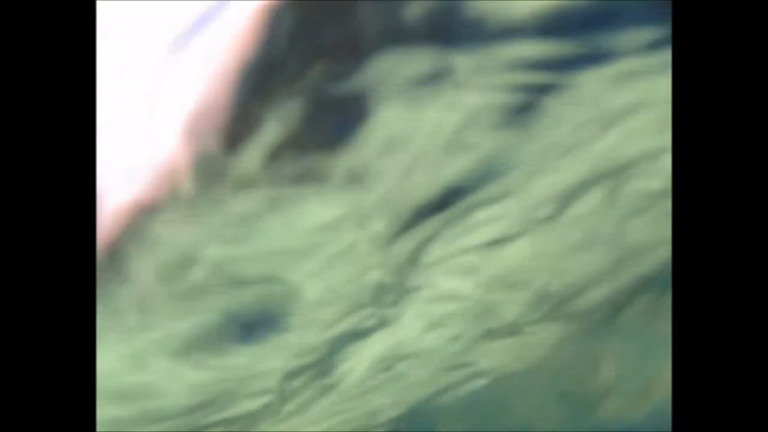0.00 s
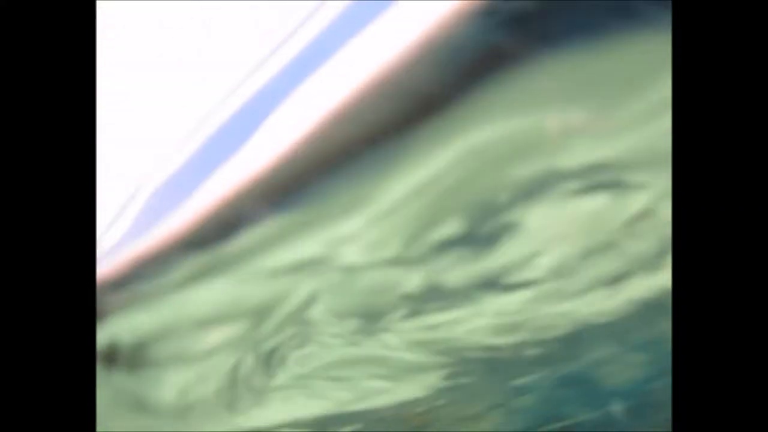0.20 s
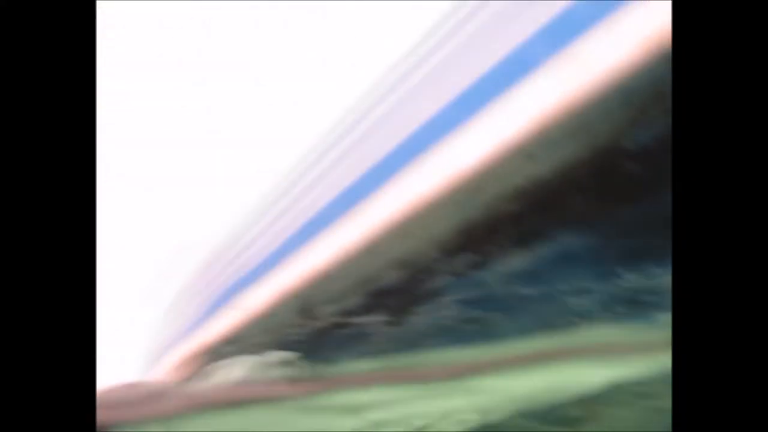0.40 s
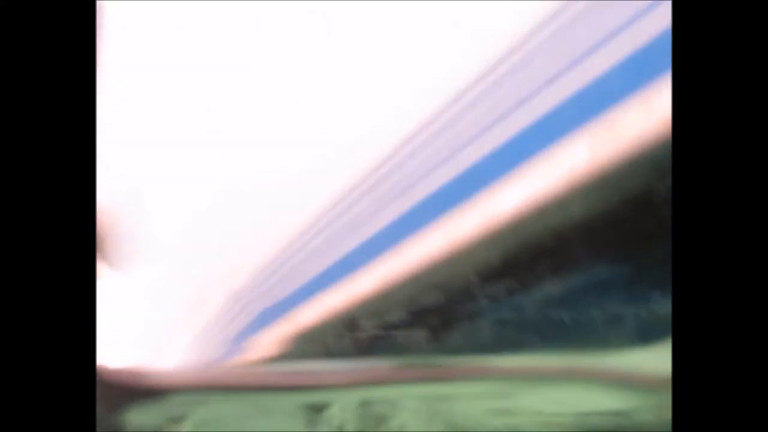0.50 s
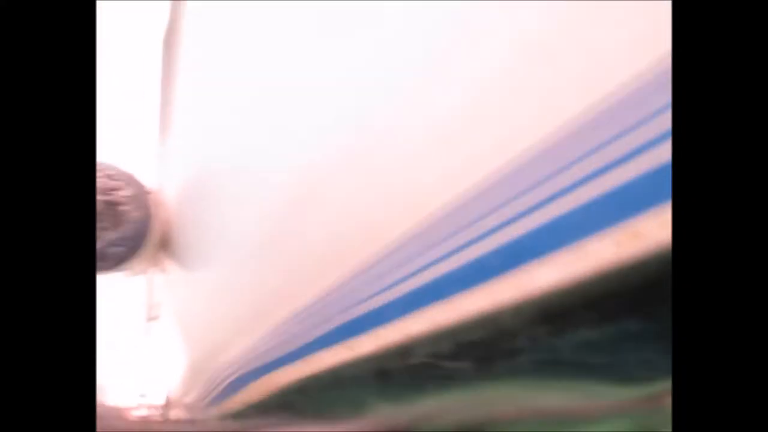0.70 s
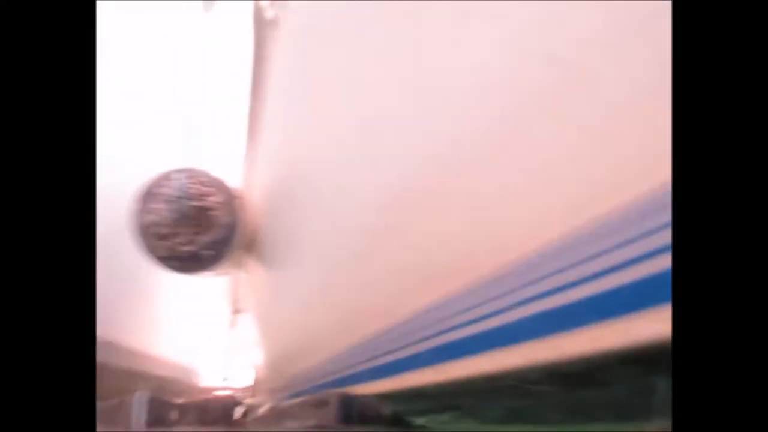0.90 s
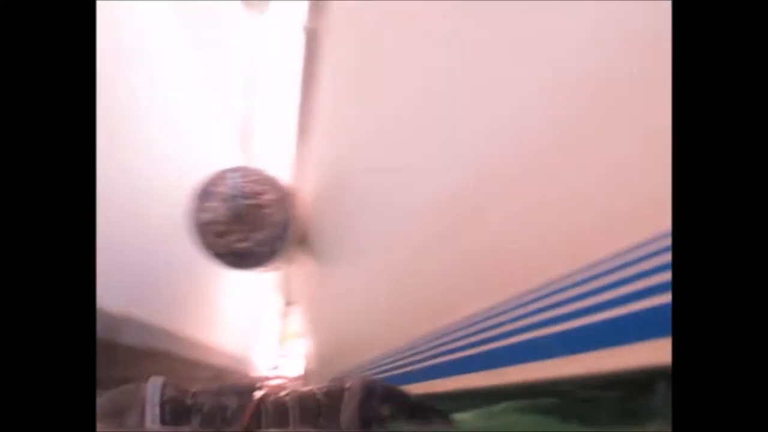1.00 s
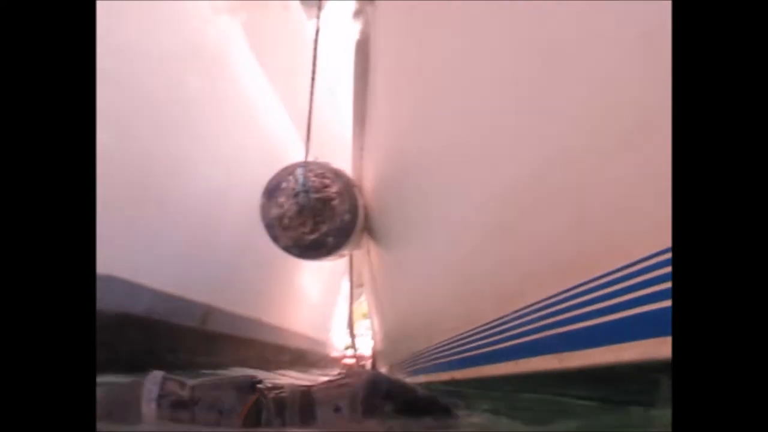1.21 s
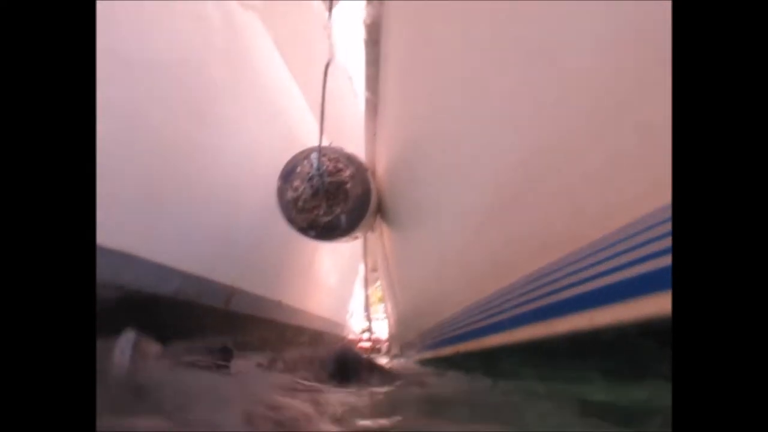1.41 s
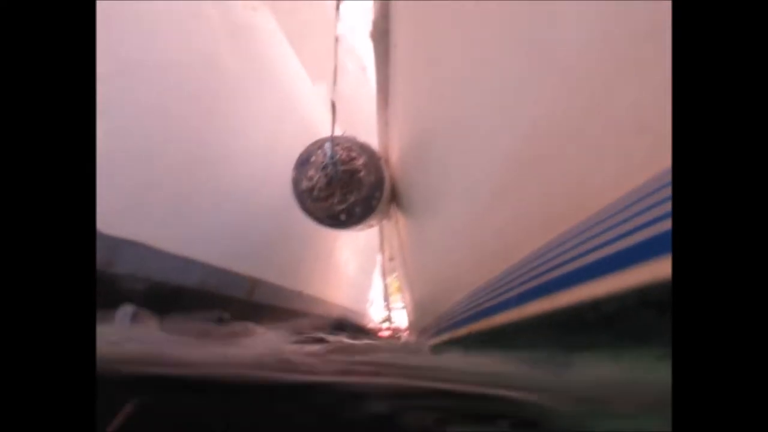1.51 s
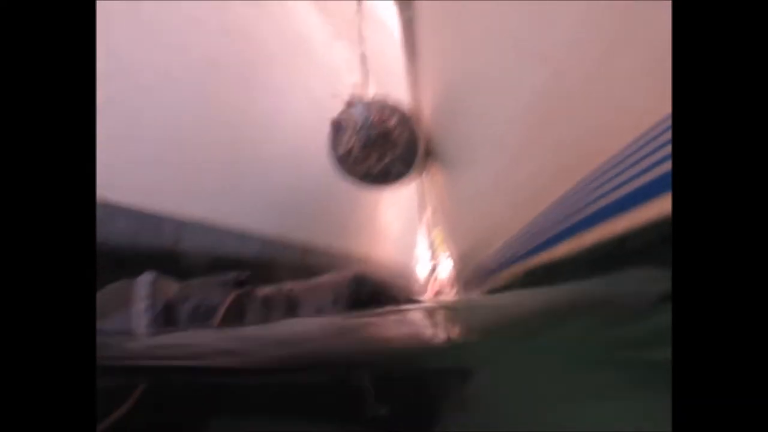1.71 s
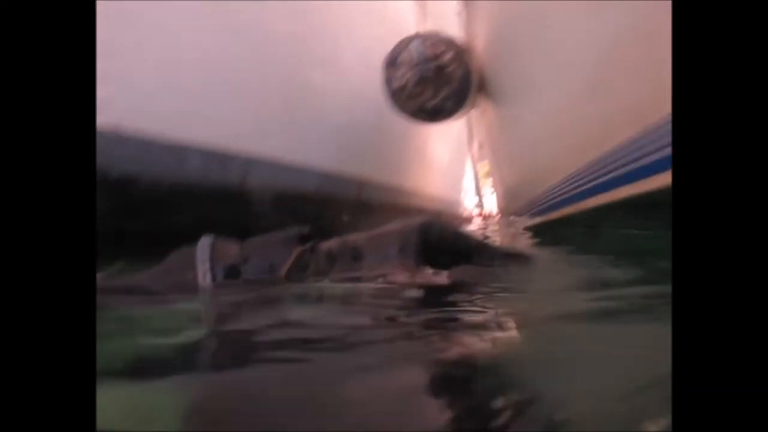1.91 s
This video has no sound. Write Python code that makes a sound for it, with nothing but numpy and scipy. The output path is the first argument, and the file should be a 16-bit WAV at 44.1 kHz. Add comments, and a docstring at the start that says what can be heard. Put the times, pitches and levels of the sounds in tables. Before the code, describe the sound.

A brush scrapes a hull at the waterline, close and muffled by a waterproof housing. Knocks and low plops lead into a loud gritty burst, a softer rub follows, then sparse ticks, bubbles and steady high electronic whine.

```python
"""Scrubbing a boat hull at the waterline

Heard through a waterproof camera housing. Bristle slips scrape in strokes and ring the housing's modes,
with snapping grit and rising bubble blips. Shaped noise bursts make knocks, ticks, plops and water crackle
that ring the hull; the tool clacks in short gritty notes, and a hard press rasps in narrow resonances.
Filtered noise washes softly underneath, and a sine is the thin steady whine of the electronics."""
import sys
import numpy as np
from scipy import signal
from scipy.fft import rfft, irfft
from scipy.io import wavfile

SR = 44100
rng = np.random.default_rng(int(sys.argv[2]) if len(sys.argv) > 2 else 0)


def waveform_to_disk(signal):
    """Save audio, clipped to [-1, 1], as 16-bit WAV at the path in sys.argv[1]."""
    frames = np.transpose(np.atleast_2d(signal))
    scaled = np.clip(frames, -1, 1) * 32767
    samples = np.round(scaled).astype(np.int16)
    wavfile.write(sys.argv[1], SR, samples)


N = 88200  # length in samples
SIZE = 4096  # samples in one short event, and points in a random wander
TOP_HZ = 16150  # upper edge of the microphone's band

# The brush strokes as breakpoints, before judder and flicker.
# Each row: time in seconds, level of the low rub in dB, level of the bristle hiss in dB.
STROKES = [(0, -63, -69), (.13, -53.5, -61), (0.16, -51, -46.5), (.21, -42, -49), (.25, -41, -32.5),
           (.32, -36, -45.5), (0.386, -36.5, -46), (0.419, -51.5, -52), (.47, -56.5, -60),
           (.59, -58.5, -61), (0.636, -51.5, -49.5), (.675, -44, -47.5), (.715, -44.5, -46.5),
           (.745, -53, -54), (.80, -62, -61.5), (.87, -60, -65.5), (.96, -52, -58), (1.0, -52.5, -62),
           (1.11, -56, -54.5), (1.21, -66, -66.5), (1.30, -57.5, -56), (1.37, -57, -60.5),
           (1.428, -54.5, -55), (1.53, -61.5, -64.5), (1.59, -57, -56.5), (1.69, -58.5, -55.5),
           (1.80, -58.5, -53.5), (1.85, -52.5, -55), (1.947, -49.5, -54.5), (2.0, -69, -68)]
JUDDER_PER_S, JUDDER_DB = 70.42, 2  # wander points per second, depth

# Contact and rattle of the short blows
BASS_LAG_S, LAG_HZ = 0.001972, 614  # how late the lowest notes arrive, and where the lag halves
CHATTER_S, CHATTER_HZ = 0.0003, 2440  # contact chatter: time scale, and pitch above which it takes over
RATTLE_S = 0.0056  # time for a rattle to fade to 1 / e
LEVEL_WINDOW_S = 0.009  # the level of a blow or clack is its rms as if spread over this time
ROUND_OCT, UPPER_STEEPNESS = 0.56, 1.33  # rounding of a spectral peak; upper skirt over lower skirt
TICK_SKIRT_DB, TICK_RATTLE_DB = 9.5, -4  # skirt per octave; rattle against the contact
HITS_DB = -5  # shared trim of knocks, plops, ticks, grit and crackle


def undb(db):
    """Decibels to gain."""
    return 10 ** (np.asarray(db) / 20)


def unit(x):
    """Scale to an rms of one."""
    return x / np.sqrt(np.mean(x ** 2))


def freqs(size):
    """Frequencies of a real spectrum in Hz, kept above zero."""
    return np.maximum(np.arange(size // 2 + 1) * SR / size, 1)


def causal(gain):
    """Minimum phase: the promptest causal response with these gains, by folding the cepstrum."""
    cepstrum = irfft(np.log(gain + 1e-6))
    half = len(cepstrum) // 2
    cepstrum[1:half] *= 2
    cepstrum[half + 1:] = 0
    return np.exp(rfft(cepstrum))


def colour(x, points):
    """Filter by a spectrum of (Hz, dB) points, joined straight over log frequency."""
    hz, db = np.array(points, float).T
    gain = undb(np.interp(np.log(freqs(2 * N)), np.log(hz), db))
    return irfft(rfft(x, 2 * N) * causal(gain))[:N]


def walk(rate):
    """Random wander with a spread near one: straight lines between `rate` random points a second."""
    return np.interp(np.arange(N) / SR * rate, np.arange(SIZE), rng.standard_normal(SIZE))


def add(out, s, sound):
    """Mix a sound in at a time in seconds."""
    i = int(np.clip(s * SR, 0, N - 1))
    out[i:i + len(sound)] += sound[:N - i]


def chance_events(per_s):
    """Independent random events at a mean rate: time in seconds, with (strength, pitch) draws."""
    chance = rng.standard_normal((SIZE, 2))
    times = np.cumsum(rng.exponential(1, SIZE)) / per_s
    return zip(times[times < N / SR], chance)


def ring(x, modes):
    """What a set of resonant modes, each (Hz, width Hz, gain dB), makes of a sound."""
    f = freqs(2 * N)
    response = 0
    for hz, width, db in modes:
        response = response + undb(db) / (1 + 1j * (f * f - hz * hz) / (f * width))
    return irfft(rfft(x, 2 * N) * response)[:N]


def hump(hz, skirt_db):
    """A rounded spectral peak; the lower skirt falls in dB per octave, the upper one more steeply."""
    octaves = np.log2(freqs(SIZE) / hz)
    steepness = np.where(octaves > 0, UPPER_STEEPNESS, 1)
    return undb(-abs(skirt_db) * steepness * (np.hypot(octaves, ROUND_OCT) - ROUND_OCT))


def burst(envelope):
    """Spectrum of a noise burst of unit energy."""
    x = rng.standard_normal(SIZE) * envelope
    return rfft(x) / np.sqrt(np.sum(x ** 2))


def blow(db, gain, rattle_db):
    """One push that chatters in the treble and, as bending waves do, lags in the bass; then a rattle."""
    t, f = np.arange(SIZE) / SR, freqs(SIZE)
    push = 1 / (1 + 1j * f / CHATTER_HZ)
    contact = push + (1 - push) * burst(t * np.exp(-t / CHATTER_S))
    rattle = undb(rattle_db) * burst(np.exp(-t / RATTLE_S))
    lag = np.exp(-2j * np.pi * BASS_LAG_S * LAG_HZ * np.arctan(f / LAG_HZ))
    y = irfft(causal(gain) * lag * (contact + rattle))
    return y * undb(db) * np.sqrt(LEVEL_WINDOW_S * SR / np.sum(y ** 2))


def brush():
    """Thousands of bristle slips a second: a low rub and a hiss judder together and ring the housing."""
    # Tone of the low rub. Each row: frequency in Hz, gain in dB.
    rub_spectrum = [(80, -33), (250, -8.5), (450, -8.5), (650, 0), (900, -4.5), (1550, 2), (1950, -11),
                    (2800, -9), (4500, -51), (16000, -71)]
    # Tone of the bristle hiss. Each row: frequency in Hz, gain in dB.
    hiss_spectrum = [(500, -13), (2000, -4), (3000, 2.5), (3700, -2.5), (4400, -1.5), (6500, -5.5),
                     (8400, -5), (10300, -4), (12500, -25), (16000, -36)]
    # Modes of the housing. Each row: frequency in Hz, width in Hz, gain over the direct sound in dB.
    housing_modes = [(400, 93, -3.5), (669, 25, -6), (885, 26, 9), (1155, 150, -26), (1516, 145, -1.5),
                     (3200, 140, -17), (3620, 75, -3.5), (6240, 53, 1), (8430, 100, 7.5)]
    slips_per_s, slip_scatter_db = 9000, 4
    stroke_s, rub_db, hiss_db = np.array(STROKES).T
    judder_db = JUDDER_DB * walk(JUDDER_PER_S)
    out = np.zeros(N)
    for spectrum, db in ((rub_spectrum, rub_db), (hiss_spectrum, hiss_db)):
        happens = rng.random(N) < slips_per_s / SR
        direction = rng.choice([-1, 1], N)
        slips = happens * direction * undb(slip_scatter_db * rng.standard_normal(N))
        stroke = undb(np.interp(np.arange(N) / SR, stroke_s, db) + judder_db)
        out += stroke * unit(colour(slips + ring(slips, housing_modes), spectrum))
    return out


def grit():
    """Specks of growth snap off under the bristles, louder as the stroke hisses louder."""
    per_s, centre_hz, spread_oct = 81, 4530, 0.63
    level_db, scatter_db = -8, 2.5  # level against the bristle hiss, before the hits trim
    stroke_s, _, hiss_db = np.array(STROKES).T
    out = np.zeros(N)
    for s, (strength, pitch) in chance_events(per_s):
        db = np.interp(s, stroke_s, hiss_db) + level_db + scatter_db * strength
        hz = centre_hz * 2 ** (spread_oct * pitch)
        add(out, s, blow(db, hump(hz, TICK_SKIRT_DB), TICK_RATTLE_DB))
    return out


def bubbles():
    """Strokes stir up short blips that rise slightly as they fade, louder as the brush rubs harder."""
    per_s, start_hz, spread_oct = 87, 940, 0.696
    fade_cycles, glide = 3, 0.026  # cycles to fade to 1 / e; fraction the pitch rises in that time
    level_db, scatter_db = -6.5, 9.5  # against the level of the rub
    stroke_s, rub_db, _ = np.array(STROKES).T
    out, t = np.zeros(N), np.arange(SIZE) / SR
    for s, (strength, pitch) in chance_events(per_s):
        cycles = start_hz * 2 ** (spread_oct * pitch) * t
        age = cycles / fade_cycles
        envelope = np.exp(-age) * (1 - np.exp(-2 * cycles))
        blip = envelope * np.sin(2 * np.pi * cycles * (1 + glide * age / 2))
        db = np.interp(s, stroke_s, rub_db) + level_db + scatter_db * strength
        add(out, s, blip * undb(db))
    return out


def crackle():
    """Faint pops in the water, at random times, levels and pitches."""
    per_s, centre_hz, spread_oct = 55, 1157, 1.12
    level_db, scatter_db = -62, 4  # before the hits trim
    out = np.zeros(N)
    for s, (strength, pitch) in chance_events(per_s):
        hz = centre_hz * 2 ** (spread_oct * pitch)
        db = level_db + scatter_db * strength
        add(out, s, blow(db, hump(hz, TICK_SKIRT_DB), TICK_RATTLE_DB))
    return out


def water():
    """A soft wash around the housing: filtered noise that wavers in level."""
    # Tone of the wash. Each row: frequency in Hz, gain in dB.
    wash_spectrum = [(20, 13.5), (45, -13.5), (100, -10), (220, -1), (400, -5), (1400, -9.5), (2200, -11.5),
                     (4000, -19.5), (9500, -30), (12500, -16), (16000, -21)]
    level_db, waver_db, waver_per_s = -56.5, 2.5, 17.0
    wash = rng.standard_normal(N) * undb(waver_db * walk(waver_per_s))
    return undb(level_db) * unit(colour(wash, wash_spectrum))


def whine():
    """The thin steady tone of the camera's electronics: one sine."""
    hz, level_db = 5881, -58  # rms level
    return undb(level_db) * np.sqrt(2) * np.sin(2 * np.pi * hz * np.arange(N) / SR)


def knocks():
    """Hard contacts: a main spectral peak with a bright crack on top, then a rattle."""
    # Each row: start in seconds, level in dB before the hits trim, centre in Hz, lower skirt in dB per
    # octave, crack in dB against the main peak, rattle in dB against the contact.
    knock_rows = [ (0.0625, -38, 1210, 7.5, -39, 5), (0.0703, -31, 1120, 10, -53, -9),
                  (0.097, -43.5, 1180, 8.5, -32, 5), (0.1987, -38, 1380, 24, -26, -15),
                  (0.2441, -23.5, 1540, 10, -37, -2), (0.3736, -25, 970, 9, -48, -1),
                  (0.4493, -39.5, 3040, 13, -31, 6), (.547, -46.5, 1750, 4.5, -14, -5),
                  (0.571, -45, 1140, 34, -36, -14), (0.656, -40.5, 1600, 37, -16, 13),
                  (0.7114, -36, 1870, 22, -34, 24), (.758, -33.5, 1230, 17, -10, 5),
                  (0.8951, -36.5, 1300, 12, -35, 3.5), (.968, -45, 1270, 7.5, -16, -8),
                  (1.009, -40.5, 1560, 13, -29, 12), (1.082, -43, 1650, 6, -23, -4),
                  (1.133, -39, 1550, 11, -16.5, 2), (1.233, -42, 860, 11.5, -37, -2),
                  (1.324, -48.5, 3620, 29, -9, -17), (1.42, -38.5, 1640, 4.5, -8.5, 8.5),
                  (1.5, -38.5, 1850, 18, -29, 14), (1.514, -34.5, 2040, 7, -34, -11),
                  (1.563, -41, 1220, 21, -21, -3), (1.59, -41, 790, 31, -24.5, 9),
                  (1.6125, -50, 750, 26, -21, -1), (1.6395, -46.5, 734, 14, -17, -11),
                  (1.729, -44.5, 620, 14, -13, 3), (1.745, -45.5, 1870, 25, -25, 1)]
    crack = hump(8000, 12.5)  # Hz, dB per octave
    out = np.zeros(N)
    for s, db, hz, skirt_db, crack_db, rattle_db in knock_rows:
        gain = np.hypot(hump(hz, skirt_db), undb(crack_db) * crack)
        add(out, s, blow(db, gain, rattle_db))
    return out


def plops():
    """Low plops of water against the housing: blows with a low spectral peak."""
    # Each row: start in seconds, level in dB before the hits trim, centre in Hz.
    plop_rows = [(.074, -35.5, 270), (.176, -36.5, 255), (.2225, -30.5, 606), (.2345, -33, 270),
                 (0.549, -49.5, 275), (0.726, -45, 576), (1.082, -49.5, 249), (1.472, -48, 477),
                 (1.5145, -43.5, 520), (1.641, -54, 380), (1.606, -47, 247), (1.731, -49.5, 248),
                 (1.847, -51.5, 376), (1.929, -55, 208)]
    skirt_db, rattle_db = 15.5, -9.5  # per octave; against the contact
    out = np.zeros(N)
    for s, db, hz in plop_rows:
        add(out, s, blow(db, hump(hz, skirt_db), rattle_db))
    return out


def clacks():
    """The tool strikes hard spots: short gritty notes, high ones shorter, and a rattle with the bass cut."""
    # Each spot rings at its own pitches. Each row: start in seconds, level in dB before the low cut,
    # fade to 1 / e at 1 kHz in seconds, notes as pairs of pitch in Hz and relative level in dB.
    clack_rows = [(0.2173, -17.5, 0.0061, [(1720, 3), (2650, 2), (5310, -4)]),
                  (.2344, -12, 0.0024, [(2730, -3), (4150, -4.5), (7900, -8.5)]),
                  (0.2909, -17.5, .0055, [(1390, 3), (2320, 0), (3490, -1.5)]),
                  (0.3326, -13.5, 0.0044, [(630, 1), (1090, 1), (1570, 0.5), (2730, -5)]),
                  (1.0223, -30.5, 0.0065, [(1250, -3.5), (3200, -1.5), (3680, 2), (4500, -5)]),
                  (1.4676, -27.5, 0.0032, [(974, 1), (1490, 2.5), (1950, -15)]),
                  (1.606, -36, 0.0059, [(680, -8), (1200, 0)])]
    grit_db, rattle_db, skirt_db = -7.5, -11, 11  # both against the tone; skirt per octave
    out, t = np.zeros(N), np.arange(SIZE) / SR
    for s, db, ring_s, notes in clack_rows:
        clack = np.zeros(SIZE)
        for k, (hz, note_db) in enumerate(notes):
            fade = np.exp(-(t / ring_s * np.cbrt(hz / 1000)) ** 1.46)
            tone = (-1) ** k * unit(fade * np.sin(2 * np.pi * hz * t))  # alternate polarity
            rough = undb(grit_db) * burst(fade) + undb(rattle_db) * burst(np.exp(-t / RATTLE_S))
            noise = irfft(rough * causal(unit(hump(hz, skirt_db)))) * np.sqrt(SIZE)
            clack += undb(note_db) * (tone + noise)
        add(out, s, unit(clack) * undb(db) * np.sqrt(LEVEL_WINDOW_S * SR / SIZE))
    low_cut = signal.butter(2, 280, "high", fs=SR, output="sos")
    return signal.sosfilt(low_cut, out)


def ticks():
    """Sharp ticks of snapping grit and tiny bubbles: blows with a mostly high spectral peak."""
    # Each row: start in seconds, level in dB before the hits trim, centre in Hz,
    # lower skirt in dB per octave (its sign is ignored).
    tick_rows = [(.2346, -21.5, 9800, 29), (.2912, -24.5, 9000, 15), (0.303, -29, 9200, 30),
                 (0.3137, -23, 7800, 31), (0.3156, -28, 3360, 14), (0.38, -38, 9800, 48),
                 (0.737, -42, 6400, 4.5), (0.7524, -33, 7400, 11), (0.7544, -38.5, 3130, 16),
                 (1.256, -42, 10200, 26), (1.407, -40.5, 9000, -1), (1.470, -39.5, 10800, 47),
                 (1.473, -58, 9600, 24), (1.5143, -35, 15400, 53), (1.839, -44.5, 4860, 2),
                 (1.955, -49.5, 3330, 11)]
    out = np.zeros(N)
    for s, db, hz, skirt_db in tick_rows:
        add(out, s, blow(db, hump(hz, skirt_db), TICK_RATTLE_DB))
    return out


def rasp():
    """Pressed hard, the brush chatters as noise in a few narrow resonances, then lifts off."""
    # Resonances of the pressed brush. Each row: frequency in Hz, width in Hz, relative gain in dB.
    rasp_modes = [(1534, 46, -2.5), (2940, 120, 2.5), (3620, 98, 5), (8295, 150, -2)]
    start_s, attack_s, end_s, release_s = 0.238, 0.035, 0.38, 0.019
    level_db = -33.5  # fully pressed, before judder and flicker
    t = np.arange(N) / SR
    attack = np.clip((t - start_s) / attack_s, 0, 1)
    release = np.exp(-np.maximum(t - end_s, 0) / release_s)
    level = undb(level_db + JUDDER_DB * walk(JUDDER_PER_S))
    return level * attack * release * unit(ring(rng.standard_normal(N), rasp_modes))


def ragged(x, count=24):
    """Let each third of an octave flicker in level on its own; overlapping bands sum to the whole."""
    flicker_per_s, flicker_db = 55, 3
    thirds_from_top = np.log(freqs(N) / TOP_HZ) / np.log(np.cbrt(2))
    place = np.clip(thirds_from_top + count - 1, 0, count - 1)
    spectrum = rfft(x)
    out = np.zeros(N)
    for k in range(count):
        band = irfft(spectrum * np.maximum(1 - abs(place - k), 0), N)
        out += band * undb(flicker_db * walk(flicker_per_s))
    return out


def hull_ring(hits):
    """The hull's bending modes answer the hits with a brief ring."""
    # Modes of the hull. Each row: frequency in Hz, width in Hz, gain over the direct sound in dB.
    hull_modes = [(179, 10.7, 3), (363.3, 27.4, 5), (545, 43, -3), (630, 67, 5), (1063, 185, 0.5),
                  (1480, 166, 1), (1678, 48, 0.5), (2820, 700, 1.5), (3800, 690, -4.5), (5100, 220, 2.5),
                  (9100, 5300, -15.5)]
    return ring(hits, hull_modes)


def scene():
    """Brush, rasp, bubbles, water and whine under clacks and the smaller hits that ring the hull."""
    bed = ragged(brush() + rasp()) + bubbles() + water() + whine()
    hits = undb(HITS_DB) * (knocks() + ticks() + plops() + grit() + crackle())
    return (bed + clacks() + hits + hull_ring(hits))[None]


def record(dry):
    """The sealed microphone dulls the top, peaks past full scale clip, and the band ends steeply."""
    # Tone through the sealed port. Each row: frequency in Hz, gain in dB.
    port_spectrum = [(20, -24), (70, 4), (170, 1.5), (10300, -3), (11100, -5.5), (11750, -21), (12400, -14),
                     (15000, -11), (16500, -17)]
    heard = np.clip(colour(dry[0], port_spectrum), -1, 1)
    band_end = signal.ellip(8, 0.2, 70, TOP_HZ, fs=SR, output="sos")  # order, ripple dB, stopband dB
    return signal.sosfilt(band_end, heard)[None]


dry = scene()
out = record(dry)
waveform_to_disk(out)
```